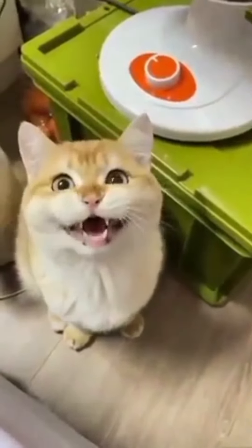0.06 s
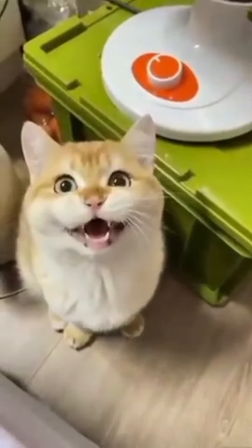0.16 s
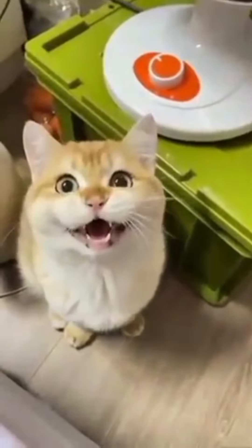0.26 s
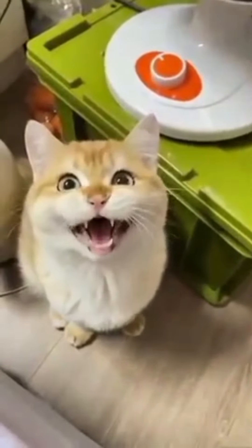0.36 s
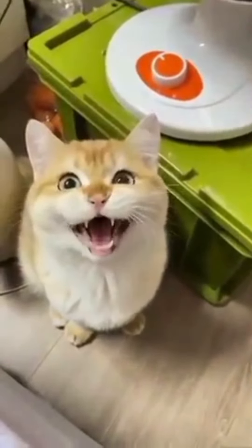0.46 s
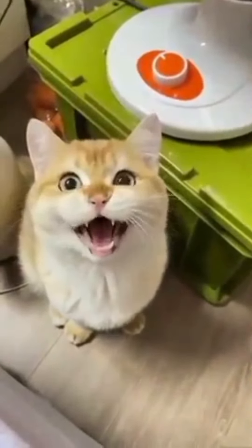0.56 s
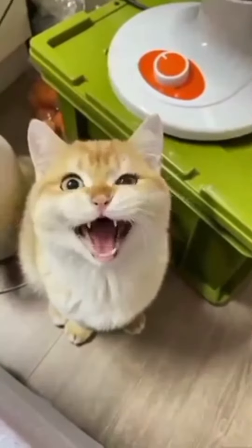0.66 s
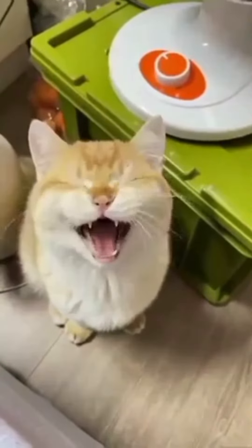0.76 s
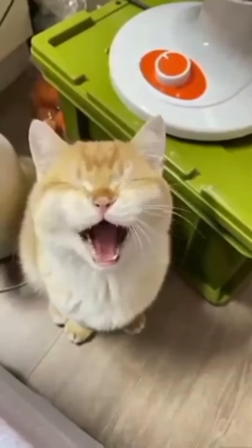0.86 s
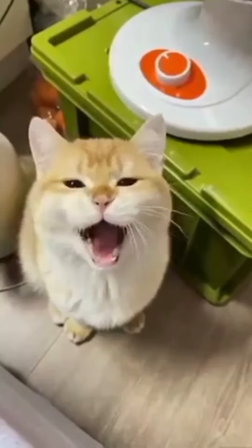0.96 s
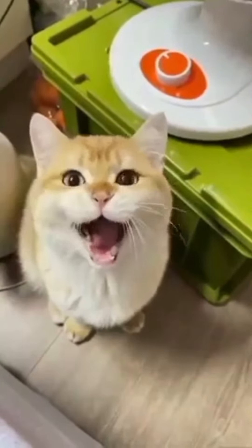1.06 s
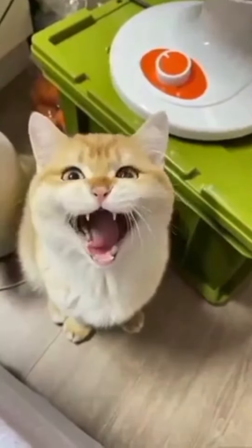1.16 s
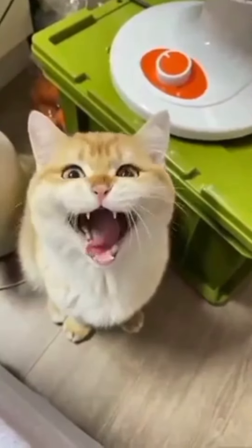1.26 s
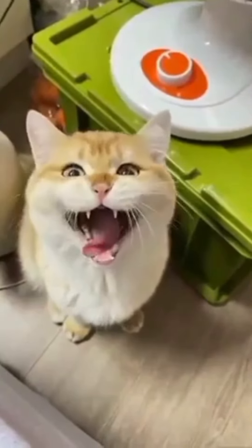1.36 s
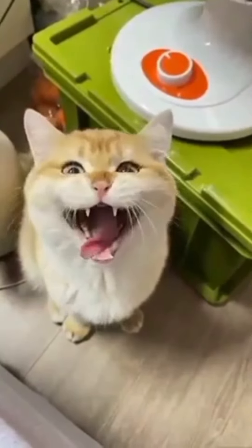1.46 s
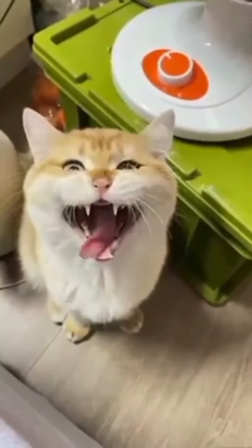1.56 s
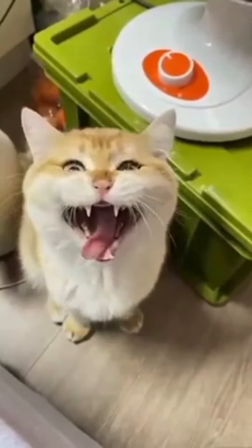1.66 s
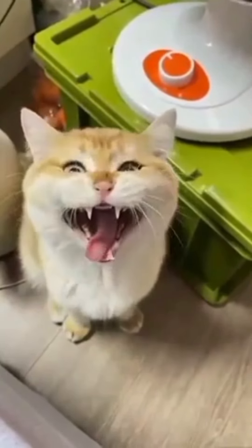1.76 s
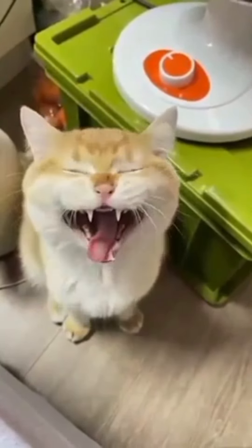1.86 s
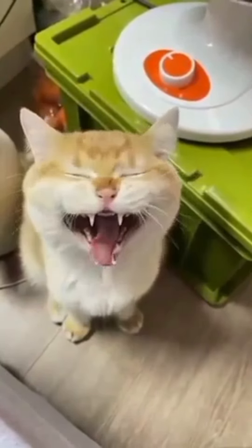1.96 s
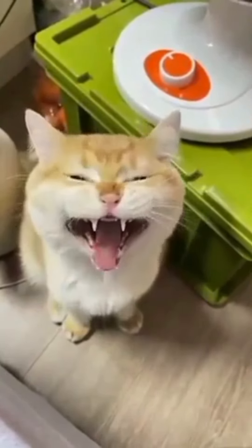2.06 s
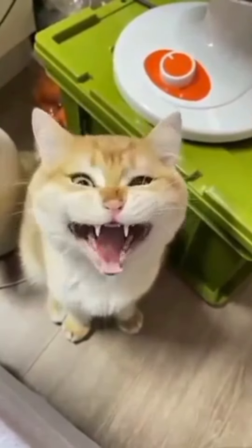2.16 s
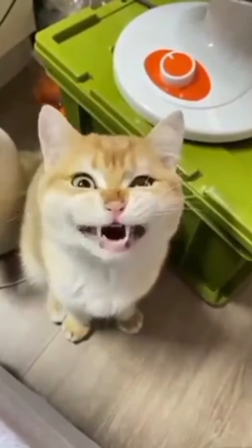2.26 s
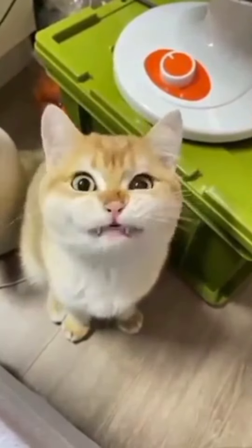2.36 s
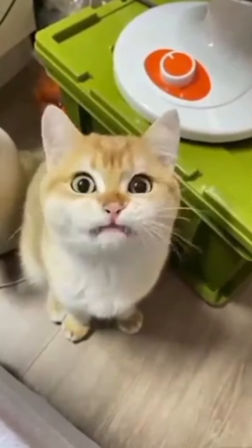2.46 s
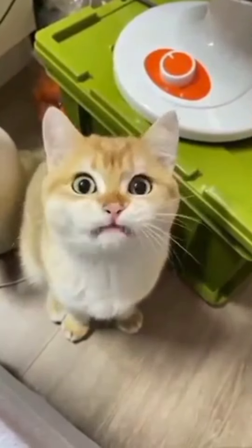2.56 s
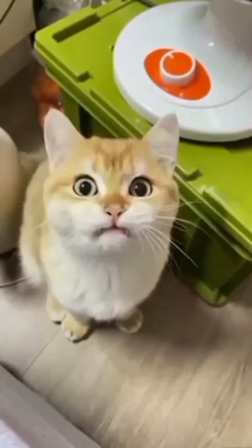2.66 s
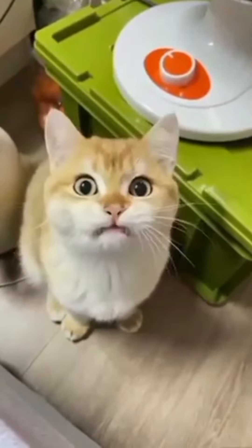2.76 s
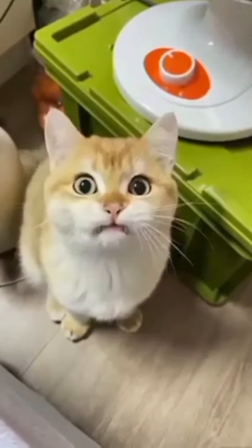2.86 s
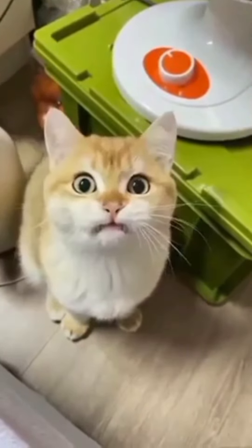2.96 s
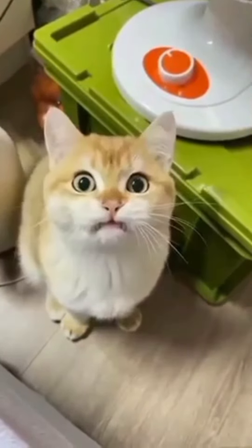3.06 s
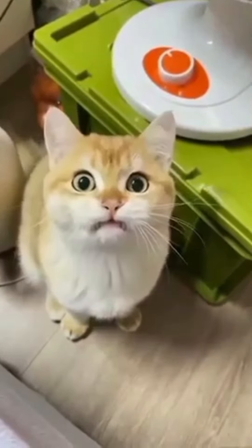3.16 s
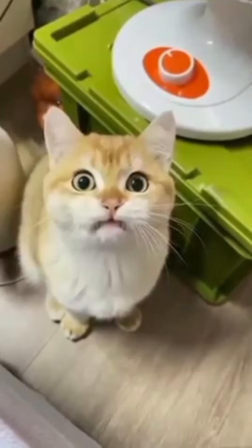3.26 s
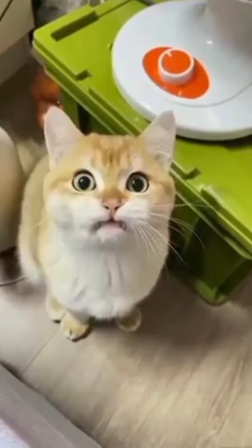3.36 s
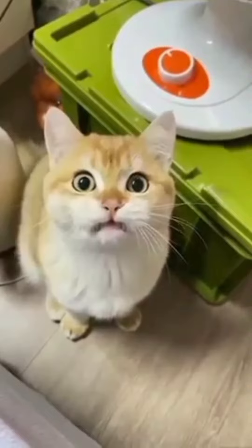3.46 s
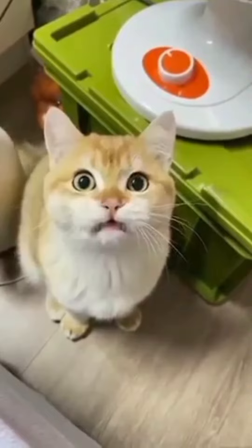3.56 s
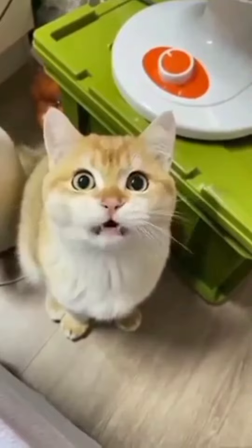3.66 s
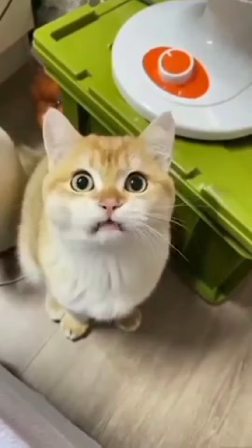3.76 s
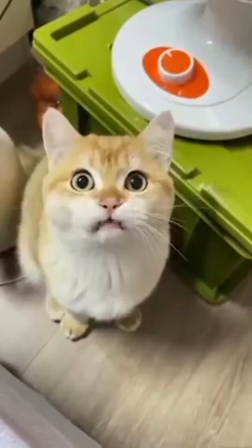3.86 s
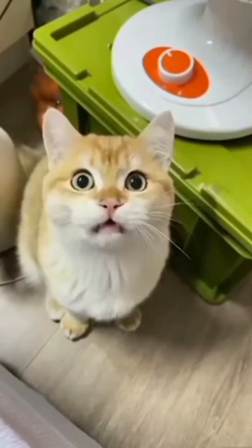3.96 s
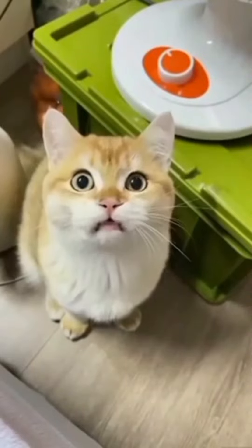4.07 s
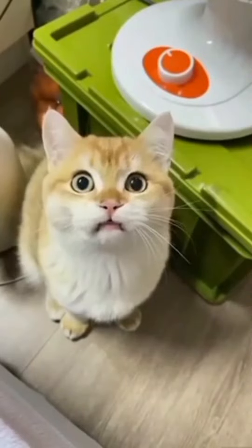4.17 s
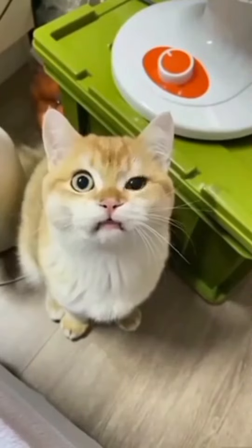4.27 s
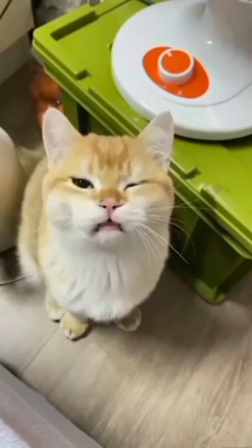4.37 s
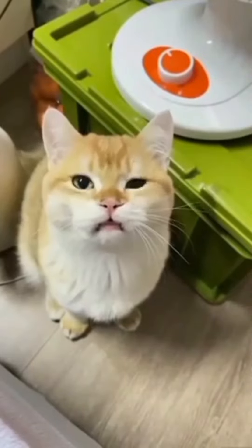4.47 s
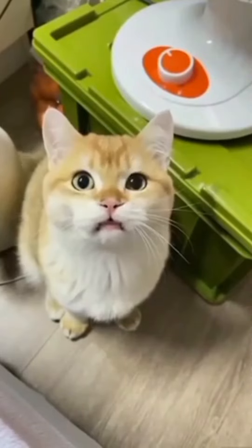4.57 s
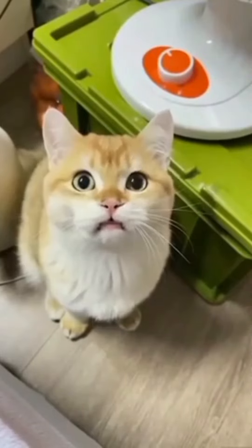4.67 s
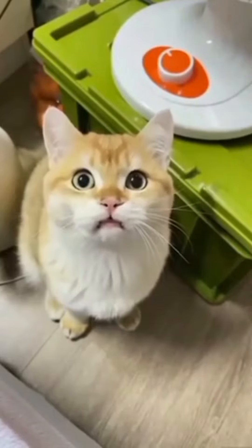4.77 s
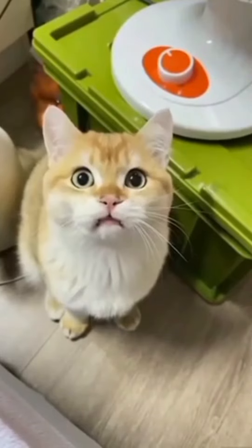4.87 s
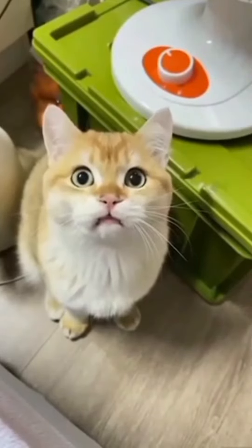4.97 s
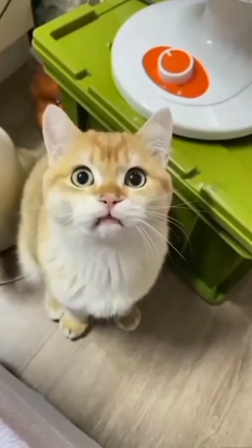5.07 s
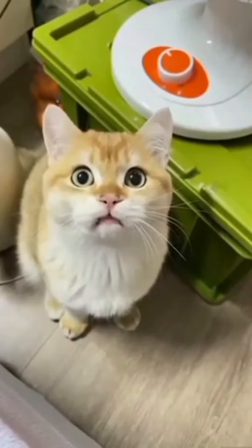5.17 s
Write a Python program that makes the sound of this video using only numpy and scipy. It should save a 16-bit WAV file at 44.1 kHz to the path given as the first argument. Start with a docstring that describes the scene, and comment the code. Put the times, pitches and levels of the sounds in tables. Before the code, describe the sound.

One cat, very close to the microphone in a small quiet room, is already meowing as the sound begins. The loud, raspy, wavering call sinks into a muffled yawn, then a short soft mew. Dry tooth ticks and wet lip smacks follow, with faint sniffs and two tiny rough chirps. A low machine rumble and thin hiss stay underneath; echo is short.

```python
"""A long wavering meow comes first, close by in a small quiet room, sinking in pitch as it turns into a yawn.
A soft mew follows, then lip smacks and two chirps, with sniffs in between and after.
The calls are vocal-fold harmonics shaped by throat and mouth, with a raspy treble on top.
Smacks and ticks are brief rings with cracks of noise; jaw air and sniffs are coloured noise in swells.
Sparse echoes make the room; a low machine rumble, a thin hiss and a faint high whine fill it."""
import sys
import numpy as np
from scipy import signal
from scipy.fft import rfft, irfft, next_fast_len
from scipy.io import wavfile
from scipy.ndimage import uniform_filter1d

SR = 44100
rng = np.random.default_rng(int(sys.argv[2]) if len(sys.argv) > 2 else 0)


def how_loud(loudness_db):
    """Turn decibels into a plain amplitude multiplier (0 dB gives 1, 20 dB gives 10)."""
    steps = np.asarray(loudness_db, float) / 20
    return 10 ** steps


def output_pcm(signal):
    """Save a mono or channel-first signal as 16-bit PCM at the path in sys.argv[1].

    Samples are clipped to [-1, 1] before scaling.
    """
    pcm = np.clip(np.atleast_2d(signal).T, -1, 1) * 32767
    wavfile.write(sys.argv[1], SR, np.round(pcm).astype(np.int16))


N = 230157  # samples

# wavering pitch of the meow: t/s, f/Hz
MEOW_PITCH = [(0, 742), (.052, 766), (.07, 743.8), (.09, 676), (.122, 730.6), (.142, 714), (.156, 682),
              (.17, 671.4), (.198, 705), (.238, 711.2), (.312, 744.3), (.368, 741.4), (.402, 708),
              (.488, 733.2), (.532, 665.7), (.56, 684.6), (.6, 632.3), (.666, 683), (.706, 645), (.73, 672),
              (.742, 652), (.764, 575), (.778, 549), (.81, 618.6), (.824, 611), (.854, 550), (.863, 560),
              (.874, 622.7), (.932, 637.5), (.988, 670.5), (1.068, 649.3), (1.084, 593.2), (1.102, 586),
              (1.128, 621), (1.184, 586), (1.214, 586.6), (1.24, 525.2), (1.262, 489.6), (1.282, 540),
              (1.346, 600), (1.36, 667), (1.365, 845), (1.382, 848.5), (1.41, 658), (1.44, 660),
              (1.47, 604), (1.488, 518.6), (1.516, 767), (1.528, 701), (1.544, 742), (1.56, 732)]
# push and mouth shape of the meow: t/s, effort level/dB, mouth (0 open, 1 yawning, 2 shut),
# raspy treble level/dB relative to the effort
MEOW_SHAPE = [(0, -19.5, 0.099, -26), (.052, -21.5, 0.27, -31.5), (0.073, -18, 0.1, -25.5),
              (.12, -16, 0, -31), (.175, -15.5, 0.037, -21.5), (.2, -21, 0, -27.5), (0.238, -16, 0, -32.5),
              (0.264, -17.5, 0.092, -25), (.36, -15.5, 0.059, -32), (.41, -14, 0.049, -29.5),
              (0.498, -15, 0.1, -31.5), (0.532, -14, 0, -26.5), (.56, -16, 0, -24.5),
              (0.609, -16.5, 0.042, -21.5), (0.627, -21.5, 0.2, -25.5), (.68, -21.5, 0.017, -25),
              (0.736, -19, 0.062, -28.5), (.76, -16.5, 0.04, -21), (.88, -19, 0.25, -18),
              (0.937, -23, 0.2, -23), (.96, -34.5, 1, -30), (1.092, -31, 1.15, -44),
              (1.199, -30.5, 1.02, -50), (1.225, -29, 1.07, -41), (1.245, -24.5, 0.64, -37.5),
              (1.281, -30.5, 1, -46), (1.35, -28, 1.04, -50), (1.363, -33, 0.54, -41),
              (1.392, -33, 0.9, -43), (1.415, -26.5, 1.18, -50), (1.435, -33, 0.96, -47),
              (1.45, -27, 1.2, -51), (1.475, -26, 1.2, -47), (1.487, -31, 1.26, -38.5),
              (1.517, -23, 2.6, -50), (1.53, -46, 1.24, -43), (1.56, -47, 1.6, -30)]
# soft mew and two chirps, one table each: t/s, pitch f/Hz, effort level/dB, mouth, raspy treble level/dB
SHORT_CALLS = [
    [(1.676, 720, -61.5, 1.9, -20), (1.694, 716, -27, 2.5, -55), (1.74, 667, -34.5, 2, -54),
     (1.758, 702, -75, 1.8, -27), (1.78, 686, -79, 1.7, -6)],
    [(3.675, 375, -38, 0, -15.5), (3.703, 420.6, -36, 0.009, -13), (3.717, 451, -32.5, 0.24, -16),
     (3.735, 529, -26, 0.21, -22), (3.747, 518, -28.5, 0.91, -16), (3.757, 474, -45, 0, -10),
     (3.767, 500, -34.5, 0.53, 1)],
    [(4.024, 438, -49, 1.4, 0), (4.04, 428, -35, 1.36, -44), (4.062, 353, -31.5, 1.15, -25),
     (4.08, 339.3, -31.5, 1, -24), (4.097, 377, -38, 0.32, -20), (4.104, 494, -31, 2.6, -24),
     (4.114, 440, -68, 0.99, 1), (4.124, 507, -48, 1.1, -17)],
]
# unsteadiness of the vocal folds: t/s, roughness (0 clean; larger shakes the harmonics more, the high ones far
# more than the low; over 1.5 the cycles turn croaky)
ROUGHNESS = [(.05, .12), (.08, .42), (.18, .4), (.21, .09), (.46, .09), (.52, .35), (.62, .38), (.66, .25),
             (.72, .3), (.76, .75), (.88, .75), (.93, .3), (1.2, .5), (1.25, 1.2), (1.3, .6), (1.44, .5),
             (1.5, 1.5), (1.7, .5), (3.67, 7), (3.7, 4.5), (3.72, 1.8), (3.75, 2.5), (3.77, 6), (4.02, 5),
             (4.07, 2), (4.13, 4)]
# jaw and tongue slide all resonances up or down: t/s, frequency factor
TRACT_SLIDE = [(0, 1.036), (.2, 0.97), (.62, 1), (.67, 0.94), (.74, 0.99), (.86, 0.97), (.885, 0.96),
               (.95, 0.91), (1.02, 1.077), (1.2, 1.052), (1.39, 0.92), (1.41, 1.076), (1.46, 0.99),
               (1.5, 0.96), (3.69, 1.005), (3.72, 0.92), (3.75, 0.99), (4.04, 0.88), (4.1, 0.94)]
# throat and mouth resonances for the three mouth shapes: f/Hz, level/dB
OPEN_MOUTH = [(400, -14), (600, -33.5), (750, -21), (1100, -9.5), (1450, -19), (1700, -17), (1900, -7),
              (2100, -3.5), (2250, -1), (2550, 2), (2750, -6), (2950, -8), (3300, -15.5), (3700, -20),
              (4100, -40), (5000, -92)]
YAWNING_MOUTH = [(350, -8.5), (500, -4), (620, -17), (800, -15), (1050, -0.5), (1250, -2.5), (1500, -6),
                 (1750, -7), (2000, -24), (2400, -19), (2800, -21.5), (3300, -23), (3700, -40.5),
                 (4200, -53.5), (5000, -92.5)]
SHUT_MOUTH = [(300, 16), (800, -5.5), (1400, -35.5), (2200, -64), (3000, -41.5), (5000, -81)]
# colour of the raspy treble, with fixed dips and peaks: f/Hz, relative level/dB
RASP_COLOUR = [(3000, -60.5), (3900, -3.5), (4600, -6), (4780, -19.5), (5000, -3.5), (5900, -5.5),
               (6450, -4), (6560, -23.5), (6650, -11.5), (6980, -7), (7060, -34.5), (7200, -14),
               (7700, -5.5), (8150, -23.5), (8440, -10.5), (8650, -32), (9350, -49), (10500, -31),
               (13000, -44), (13200, -67)]
# dry tongue and tooth ticks: t/s, ring level/dB, ring f/Hz, crack level/dB at 2.2-6 kHz and at 6-13 kHz
TICKS = [(2.136, -27.5, 11600, -50, -37), (2.3321, -26, 8750, -68, -39.5), (2.3693, -26, 2660, -60, -41.5),
         (2.494, -30.5, 4750, -43, -62), (2.5311, -10, 4250, -33.5, -53), (2.5387, -18, 3730, -39, -45.5),
         (2.8538, -45, 8240, -56, -56), (4.0211, -16, 2530, -32, -27), (4.3987, -32.5, 2953, -58, -62)]
# wet lip smacks: t/s, ring level/dB, ring f/Hz, thud level/dB at 250-1100 Hz, crack level/dB at 2.2-6 kHz
SMACKS = [(2.2454, -44, 2650, -29.5, -34), (2.2631, -23, 6700, -28.5, -36),
          (3.4884, -28.5, 4240, -45.5, -42), (3.5128, -16, 2400, -35.5, -32.5),
          (3.5176, -21, 7000, -37, -49), (3.5294, -21.5, 3960, -58, -46), (3.677, -26.5, 2800, -37, -52),
          (3.7616, -19, 2320, -26.5, -41), (4.551, -34.5, 2120, -53, -69), (4.6209, -49, 2340, -48.5, -74)]
# air hissing past tongue and teeth as the jaws shut: start t/s, level/dB, hold t/s, fade by 60 dB t/s
PUFFS = [(2.24, -50.5, 0.077, 0.016), (2.325, -47.5, 0.0014, 0.085), (2.359, -54, 0.0091, 0.18),
         (3.509, -46.5, .004, .16), (4.015, -36.5, 0.0026, 0.06), (4.41, -67, 0.019, 0.036),
         (4.547, -67.5, 0.0021, .12), (4.613, -64.5, .002, 0.082)]
# colour of the jaw air: f/Hz, relative level/dB
JAW_COLOUR = [(100, -20), (200, -6), (400, -12), (800, -6), (1500, -10), (2200, -11), (2650, 3),
              (3200, -11), (3900, -6), (4500, -12), (5200, -6), (5900, -20), (6600, -7), (8000, -18),
              (13000, -26), (13400, -40)]
# sniffs through the nose: start t/s, length t/s, level/dB
SNIFFS = [(1.598, 0.18, -67.5), (1.821, 0.13, -68.5), (2.75, 0.035, -69.5), (3.401, 0.04, -68),
          (4.31, 0.19, -68.5), (4.81, 0.19, -65), (5.095, 0.048, -73)]
# colour of the sniffs: f/Hz, relative level/dB
NOSE_COLOUR = [(2650, -38), (4500, -30), (5980, -15), (6740, 1), (7600, 8.5), (8580, -6), (9080, -56),
               (10000, -12), (13000, -35), (22000, -120)]
# how fast the room dies away: f/Hz, fall by 60 dB t/s
ROOM_DECAY = [(400, 0.14), (2000, 0.096), (8000, 0.05)]
# wavering tones of the machine rumble: f/Hz, level/dB
RUMBLE_TONES = [(43, -52.5), (61, -49), (84, -51.5)]
# colour of the room noise: f/Hz, relative level/dB
HISS_COLOUR = [(65, -29.5), (110, 2), (119, -7), (152, -5), (222, -14.5), (295, -9), (326, -30.5),
               (391, -20), (507, -30.5), (572, -29.5), (790, -46), (966, -38), (1660, -30.5), (6150, -37.5),
               (7670, -36.5), (13500, -51)]


def evened(x):
    """Scales a signal to rms 1."""
    return x / np.sqrt(np.mean(x ** 2) + 1e-20)


def read(points, hz):
    """Reads a curve over frequency, straight between points on a log scale."""
    f, value = np.transpose(points)
    return np.interp(np.log(hz + 1), np.log(f + 1), value)


def add(mix, s, sound):
    """Lays a sound into the mix at s seconds."""
    part = mix[round(s * SR):][:len(sound)]
    part += sound[:len(part)]


def vocal_folds(t, hz):
    """Thirty harmonics; uneven cycles shake each one, the high ones most, and fill the gaps with noise."""
    k = np.arange(1, 31)[:, None]
    shake = rng.standard_normal((len(t), len(k), 2)) @ [1, 1j]
    # neighbouring harmonics move together
    shake = uniform_filter1d(shake.real, size=3, axis=1) + 1j * uniform_filter1d(shake.imag, size=3, axis=1)
    shake = signal.sosfilt(signal.butter(4, 200, fs=SR, output="sos"), shake.T)
    shake /= np.sqrt(np.mean(abs(shake) ** 2))
    rough = np.interp(t, *np.transpose(ROUGHNESS))
    shaken_share = np.clip(rough * (k * hz / 5000) ** 2, 0, 1)
    steady_share = np.sqrt(1 - shaken_share ** 2)
    cycles = np.cumsum(hz) / SR
    turns = np.exp(2j * np.pi * k * cycles + 1j * 0.2 * k ** 2)
    folds = np.sqrt(2) * ((steady_share + shaken_share * shake) * turns).real
    # in a croak strong and weak cycles alternate, from the third harmonic up
    croak = np.clip((rough - 1.5) * .4, 0, .7)
    folds[2:] *= 1 + croak * np.cos(np.pi * cycles)
    return folds


def throat_and_mouth(t, hz, mouth):
    """Level in dB of each harmonic as the resonances blend between mouth shapes and slide."""
    k = np.arange(1, 31)[:, None]
    opened, shut = np.clip(1 - mouth, 0, 1), np.clip(mouth - 1, 0, 1)
    yawning = 1 - opened - shut
    slid_hz = k * hz / np.interp(t, *np.transpose(TRACT_SLIDE))
    return (opened * read(OPEN_MOUTH, slid_hz) + yawning * read(YAWNING_MOUTH, slid_hz)
            + shut * read(SHUT_MOUTH, slid_hz))


def raspy_treble(folds):
    """Harmonics from the fourth up, each swelling and fading on its own, coloured and held to an even level."""
    drift_db = 4
    count, length = folds.shape
    slow = signal.butter(2, 12, fs=SR, output="sos")
    drift = evened(signal.sosfilt(slow, rng.standard_normal((length, count)).T))
    overtones = (how_loud(drift_db * drift) * folds)[3:].sum(0)
    size = next_fast_len(length + 2048)
    colour = how_loud(read(RASP_COLOUR, np.fft.rfftfreq(size, 1 / SR)))
    rasp = irfft(rfft(overtones, size) * colour, size)[:length]
    return rasp / np.sqrt(uniform_filter1d(rasp ** 2, size=800) + 1e-12)


def voice(pitch, shape, fade_s):
    """One call: vocal-fold harmonics through throat and mouth plus raspy treble, both driven by the effort."""
    t = np.arange(pitch[0][0], pitch[-1][0], 1 / SR)
    s, *controls = np.transpose(shape)
    lines = np.interp(t, *np.transpose(pitch)), *(np.interp(t, s, c) for c in controls)
    hz, effort_db, mouth, rasp_db = (uniform_filter1d(c, size=300, mode="nearest") for c in lines)
    folds = vocal_folds(t, hz)
    body = (how_loud(throat_and_mouth(t, hz, mouth)) * folds).sum(0)
    rasp = how_loud(rasp_db) * raspy_treble(folds)
    # a call at time zero starts without a fade-in
    since_start = t - t[0] + fade_s * (t[0] == 0)
    ends = np.clip(np.minimum(since_start, t[-1] - t) / fade_s, 0, 1)
    return t[0], (body + rasp) * how_loud(effort_db) * ends


def calls():
    """The meow, a soft mew after it and two chirps, all from the same voice."""
    out = np.zeros(N)
    add(out, *voice(MEOW_PITCH, MEOW_SHAPE, fade_s=0.0054))
    for rows in SHORT_CALLS:
        pitch = [row[:2] for row in rows]
        shape = [(row[0], *row[2:]) for row in rows]
        add(out, *voice(pitch, shape, fade_s=0.006))
    return out


def click(ring_db, hz, cracks, crack_t60_s):
    """A brief ring of the mouth plus a dying crack of noise in the given (band, dB) pairs."""
    t = np.arange(4000) / SR
    ring = how_loud(ring_db - 60 * t / 0.0041) * np.sin(2 * np.pi * hz * t) * np.minimum(t / 0.00057, 1) ** 2
    crack = sum(how_loud(db) * evened(signal.sosfilt(band, rng.standard_normal(len(t)))) for band, db in cracks)
    return ring + crack * how_loud(-60 * t / crack_t60_s) * np.minimum(t / 0.00073, 1)


def clicks():
    """Dry ticks crack in the middle and top bands; wet smacks add a low thud."""
    out = np.zeros(N)
    low, mid, top = [signal.butter(3, edges, "bandpass", fs=SR, output="sos")
                     for edges in ([250, 1100], [2200, 6000], [6000, 13000])]
    lead_s = .0005  # each click starts this much ahead of its table time
    for s, ring_db, hz, mid_db, top_db in TICKS:
        cracks = [(mid, mid_db), (top, top_db)]
        add(out, s - lead_s, click(ring_db, hz, cracks, crack_t60_s=0.016))
    for s, ring_db, hz, thud_db, mid_db in SMACKS:
        cracks = [(low, thud_db), (mid, mid_db), (top, mid_db - 7.5)]
        add(out, s - lead_s, click(ring_db, hz, cracks, crack_t60_s=0.012))
    return out


def noise(colour, patchy_db, size):
    """Random short-time spectra of the given colour with drifting patches, rms 1."""
    frames, hz = 4 * N // size + 5, np.fft.rfftfreq(size, 1 / SR)
    a, b, patches = rng.standard_normal((frames, len(hz), 3)).T
    patches = evened(uniform_filter1d(uniform_filter1d(patches, size=6, axis=0), size=6, axis=1))
    z = (a + 1j * b) * how_loud(read(colour, hz)[:, None] + patchy_db * patches)
    return evened(signal.istft(z, nperseg=size, noverlap=3 * size // 4)[1][:N])


def breath():
    """Air through the closing jaws (rise, hold, fade) and through the nose (one swell per sniff)."""
    puffs, sniffs, t = np.zeros(N), np.zeros(N), np.arange(SR // 4) / SR
    rise_s = .0035
    for s, db, hold_s, t60_s in PUFFS:
        fading_s = np.maximum(t - rise_s - hold_s, 0)
        add(puffs, s, np.minimum(t / rise_s, 1) ** 2 * how_loud(db - 60 * fading_s / t60_s))
    for s, length_s, db in SNIFFS:
        swell = np.sin(np.pi * np.minimum(t / length_s, 1)).clip(0)
        add(sniffs, s, how_loud(db) * swell ** 0.4)  # power 0 = flat, larger = softer ends
    jaws = noise(JAW_COLOUR, patchy_db=2.5, size=512) * puffs
    # saliva makes the jaw air crackle
    wet = how_loud(3.5 * evened(uniform_filter1d(rng.standard_normal(N), size=80)))
    return jaws * evened(wet) + noise(NOSE_COLOUR, patchy_db=3.5, size=256) * sniffs


def room(x):
    """Sparse echoes of random sign, each band dying at its own speed."""
    taps = np.zeros(SR // 2)
    at = np.arange(200, len(taps) - 20, 20)
    taps[at + rng.integers(0, 20, len(at))] = rng.choice([-1., 1.], len(at))
    hz, t, z = signal.stft(taps, SR, nperseg=256)
    decay = how_loud(-60 * t / read(ROOM_DECAY, hz)[:, None])
    tail = signal.istft(z * decay, SR, nperseg=256)[1]
    return signal.fftconvolve(x, tail / np.linalg.norm(tail))[:N]


def resonate(x, hz, width_hz):
    """One fixed resonance of gain 1."""
    r = np.exp(-np.pi * width_hz / SR)
    return 2 * signal.lfilter([1 - r], [1, -r * np.exp(2j * np.pi * hz / SR)], x).real


def wavering(hz, width_hz):
    """Noise through the same resonance three times over: a fuzzy tone, rms 1."""
    x = rng.standard_normal(N)
    for _ in range(3):
        x = resonate(x, hz, width_hz)
    return evened(x)


def background():
    """Machine rumble of three wavering tones, coloured noise for the hiss and a faint high whine."""
    rumble = sum(how_loud(db) * wavering(hz, width_hz=18.7) for hz, db in RUMBLE_TONES)
    whine = how_loud(-87) * wavering(8441, width_hz=12)
    hiss = how_loud(-61) * noise(HISS_COLOUR, patchy_db=4.3, size=2048)
    return hiss + rumble + whine


def scene():
    """The cat, its echo in the room and the background, in mono."""
    cat, mouth_clicks = calls() + breath(), clicks()
    echo = room(how_loud(-15.5) * cat + how_loud(-10.5) * mouth_clicks)
    return (cat + mouth_clicks + echo + background())[None]


def band_limit(x):
    """A steep low-pass at the top of the band."""
    return signal.sosfilt(signal.butter(12, 13620, fs=SR, output="sos"), x)


def record(dry):
    """Takes off the treble above 13.2 kHz and delivers the finished mix."""
    finished = signal.oaconvolve(dry, signal.firwin(255, 13200, fs=SR)[None], "same")
    return band_limit(finished)


dry = scene()
out = record(dry)
output_pcm(out)
```